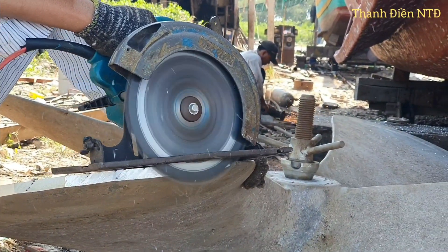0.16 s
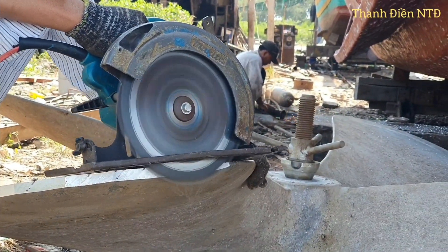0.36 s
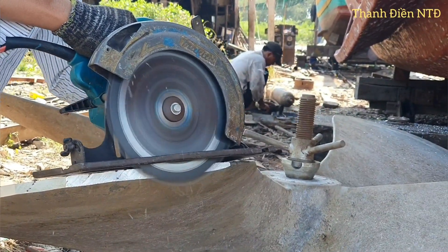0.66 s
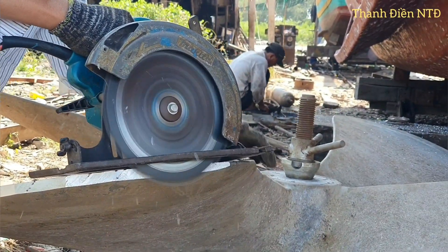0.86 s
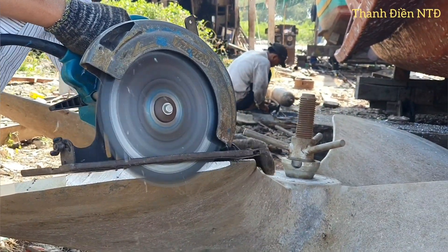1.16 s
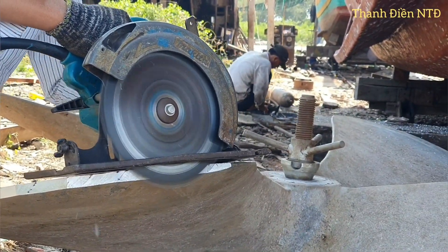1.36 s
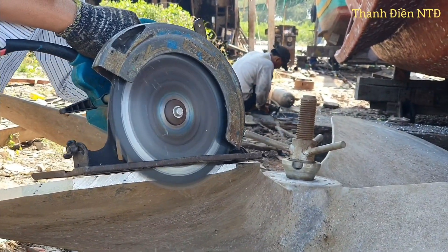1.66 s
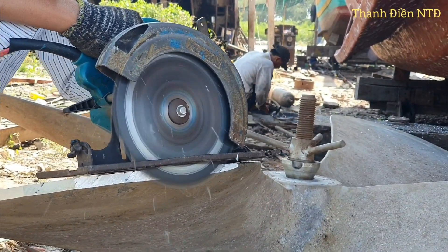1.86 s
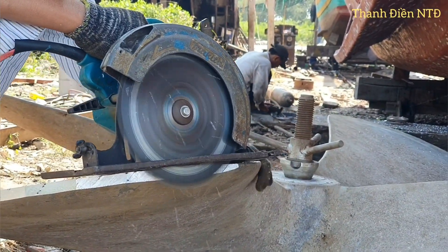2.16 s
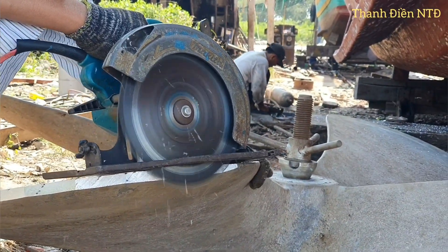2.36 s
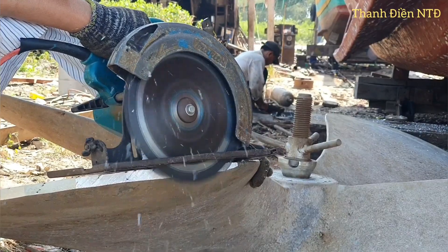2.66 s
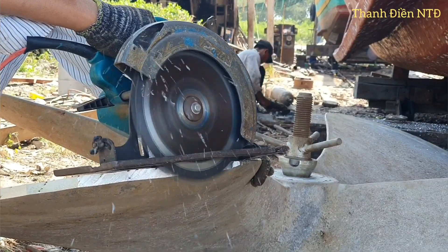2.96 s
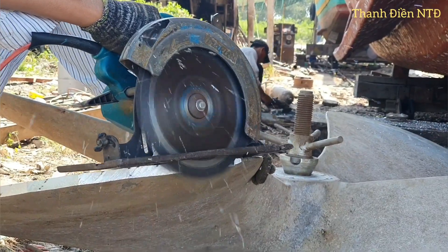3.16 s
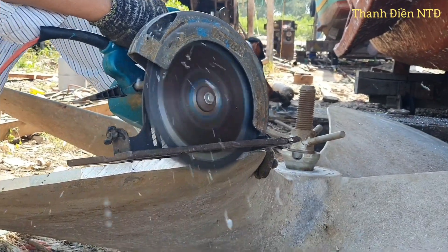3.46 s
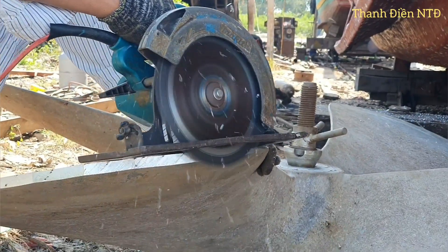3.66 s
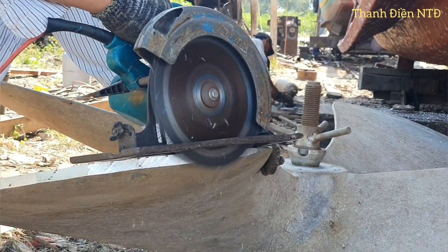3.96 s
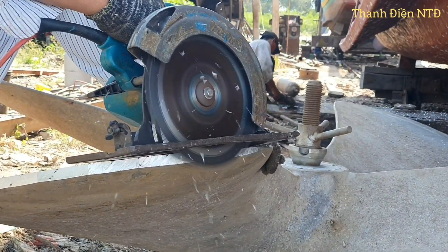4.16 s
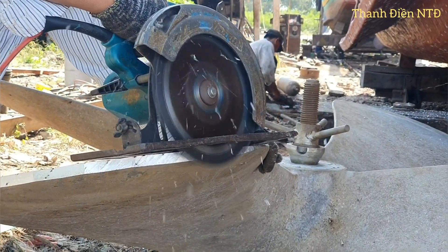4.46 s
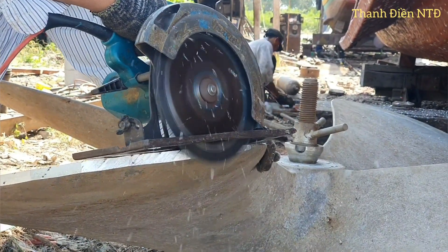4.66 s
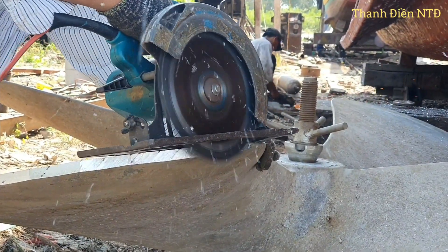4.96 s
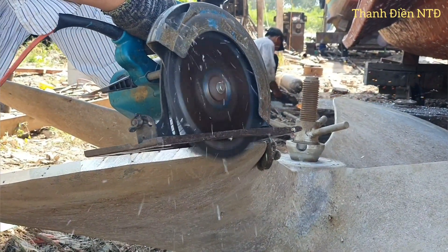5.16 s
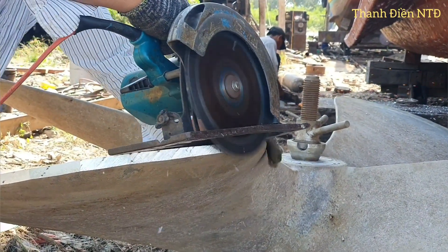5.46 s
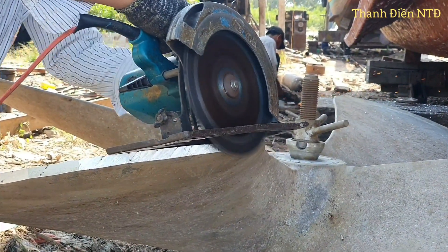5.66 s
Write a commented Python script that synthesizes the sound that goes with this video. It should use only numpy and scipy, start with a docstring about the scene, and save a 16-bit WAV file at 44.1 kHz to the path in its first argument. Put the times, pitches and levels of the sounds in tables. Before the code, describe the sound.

Very close to a stereo microphone, a handheld circular saw is already cutting thick aluminium. A dense, rough, high whine and bright hiss run throughout over rapid buzzing chatter, while the bite repeatedly slackens and digs in again. A brief rising squeal comes at about one second, and low gusts of air buffet the microphone. Near the end the chatter weakens and the sound shifts a little to the right. Dry, with no audible echo.

```python
"""Right in front of a two-port microphone, a handheld circular saw cuts a thick aluminium blade.
The teeth scrape at random and keep the steel disc and the workpiece ringing; the hand's feed swells and eases the bite.
Friction locks disc modes into held tones and, for a moment, a squeal; the workpiece chatters once a turn.
Chips hiss out of the kerf in filtered noise, and the air thrown by the disc buffets the microphone in lumps."""
import sys
import numpy as np
from scipy import signal
from scipy.fft import rfft, irfft, next_fast_len
from scipy.io import wavfile
from scipy.ndimage import uniform_filter1d, map_coordinates

SR = 44100
rng = np.random.default_rng(int(sys.argv[2]) if len(sys.argv) > 2 else 0)


def pcm_store(signal):
    """Save signal as 16-bit PCM."""
    levels = np.round(np.clip(np.atleast_2d(signal), -1, 1) * 32767)
    wavfile.write(sys.argv[1], SR, levels.astype(np.int16).T)


N = 257141  # length in samples

# how hard the hand drives the saw, heard as the strength of the draught: (time [s], relative level [dB])
FEED_CURVE = [(0, -49), (0.55, -40.3), (0.75, -34.5), (1.2, -36.9), (1.46, -30), (1.65, -35), (2.1, -46),
              (2.4, -37.5), (2.6, -32.5), (2.95, -39.5), (3.27, -33.5), (3.8, -43), (4.3, -33.5),
              (4.6, -35), (5.0, -37), (5.25, -33.5), (5.5, -38), (5.83, -43.5)]
# the disc digs in: (time [s], half length [s], extra chatter [dB], extra draught [dB])
DIG_INS = [(.01, 0.03, 6, 7), (.09, .03, 4.5, 0), (.18, .04, 3.5, 0), (.46, 0.1, 3.5, 1),
           (.72, 0.031, 1.5, 5), (.96, 0.043, 3, 4), (1.13, .06, 5, 3.5), (1.44, 0.032, 6, 3),
           (1.91, 0.063, 3.5, 1), (2.23, .06, 4.5, -6), (2.38, .05, 3, 4), (2.5, 0.03, 7, -1),
           (3.01, 0.026, 2, -2), (3.55, .05, 0, 6), (4.02, 0.13, 4.5, -2), (4.12, .04, 3.5, 6),
           (4.32, 0.045, 7, 2), (4.59, 0.061, 0, 6), (4.79, 0.036, 4.5, 6.5), (5.25, .04, 0, 4)]


def amp(db):
    """Decibels to gain."""
    return 10 ** (np.asarray(db) / 20)


def unit(x):
    """Scale to rms 1."""
    return x / np.sqrt(np.mean(x ** 2) + 1e-20)


def along(points, hz):
    """Join (frequency [Hz], value) points on a log frequency axis."""
    f, v = np.transpose(points)
    return np.interp(np.log(hz + 1), np.log(f + 1), v)


def curves(rows):
    """One value per sample for each column after the time."""
    s, *cols = np.transpose(rows)
    return [np.interp(np.arange(N) / SR, s, c) for c in cols]


def swells(rows):
    """Smooth bumps from (time [s], half length [s], height, ..) rows: one curve for each height column."""
    rows = np.array(rows, float)
    t = np.arange(N) / SR
    total = np.zeros((rows.shape[1] - 2, N))
    for s, half, *heights in rows:
        near = np.abs(t - s) < half
        bump = np.cos(np.pi / 2 * (t[near] - s) / half) ** 2
        total[:, near] += np.outer(heights, bump)
    return total


def wobble(rate):
    """A smooth random curve, rate knots a second."""
    knots = rng.standard_normal(int(N * rate / SR) + 4)
    coarse = np.arange(0, N, 16)  # spline every 16th sample, straight lines between
    return np.interp(np.arange(N), coarse, map_coordinates(knots, [coarse * rate / SR]))


def filtered(x, response):
    """Shape the spectrum of x by a response of frequency."""
    m = next_fast_len(N + 8192)
    return irfft(rfft(x, m) * response(np.fft.rfftfreq(m, 1 / SR)), m)[..., :N]


def panned(db):
    """Left and right gains of constant power for a left-minus-right level in dB."""
    ratio = amp(db)
    return np.array([ratio, np.ones_like(ratio)]) * np.sqrt(2 / (1 + ratio ** 2))


def ports(pair):
    """Each microphone port has its own colour and delay."""
    # (frequency [Hz], left minus right level [dB])
    balance = [(60, -4), (150, -2.5), (330, -7), (700, -4), (1000, -.3), (1450, -2.5), (2700, -.5),
               (4300, -9), (6400, -9), (8300, 0), (9400, 6), (11200, -3), (12100, -5), (14500, 0)]
    # (frequency [Hz], phase by which the left leads [rad])
    lead = [(3500, 0), (5000, 1.84), (6300, 3.5), (7000, 3.5), (8200, 8), (9200, 9.5), (10500, 9.5),
            (12100, 10.5), (13300, 13.5), (15000, 14.5)]

    def response(hz):
        half_leads = np.outer([0.5, -0.5], along(lead, hz))
        return panned(along(balance, hz)) * np.exp(1j * half_leads)
    return filtered(pair, response)


def scrape(patchy_db):
    """Two random forces whose strength drifts from band to band, as the contact wanders."""
    z = signal.stft(rng.standard_normal((2, N)), nperseg=1024)[2]
    field = rng.standard_normal(z.shape[1:])
    field = uniform_filter1d(field, size=5, axis=0)  # across frequency
    field = uniform_filter1d(field, size=12, axis=1)  # across time
    return signal.istft(z * amp(patchy_db * unit(field)), nperseg=1024)[1][:, :N]


def ring(force, modes, bed):
    """A force through resonances and a broad noise bed, as both ports hear it; the middle has rms 1."""
    # how alike the ports sound: (frequency [Hz], likeness [0-1])
    likeness = [(100, .05), (300, 0.074), (700, 0.3), (1000, 1), (1280, 0.49), (2000, 0.31), (2700, 0.82),
                (3400, .35), (4500, 0.27), (6500, 0.29), (10000, 0.17), (15000, 0.18)]

    def response(hz):
        power = amp(along(bed, hz)) ** 2 if bed else 0
        for centre, width, db in modes:
            detuning = 2 * (hz - centre) / width
            power = power + (amp(db) / (1 + (np.sqrt(2) - 1) * detuning ** 2)) ** 2  # -3 dB at the width
        turn = np.arccos(np.clip(along(likeness, hz), -1, 1)) / 2
        return np.sqrt(power) * np.array([np.cos(turn), np.sin(turn)])
    mid, side = filtered(force, response)
    pair = ports(np.array([mid + side, mid - side]))
    return pair / np.std(pair.mean(axis=0))


def bent(pair, shift):
    """Glide every resonance by a shift in per cent, by reading the sound faster or slower."""
    place = np.cumsum(1 + shift / 100)
    fine = signal.resample_poly(pair, 2, 1, axis=1)  # doubled rate keeps the treble clean
    return np.array([map_coordinates(side, [2 * place], mode="mirror") for side in fine])


def tone(hz, shift, jitter_hz, flutter_db):
    """A self-excited vibration of rms 1, unsteady in pitch and strength; shift in per cent."""
    pitch = hz * (1 + shift / 100) + jitter_hz * wobble(70)
    wave = np.sin(2 * np.pi * np.cumsum(pitch) / SR)
    return unit(amp(flutter_db * wobble(16)) * wave)


def hand():
    """What the hand does: feed in dB about its mean, easing off 0-1, withdrawal 0-1."""
    # the whole cut slackens: (time [s], half length [s], depth [0-1])
    eases = [(.09, 0.068, 0.3), (.33, 0.15, 1), (.57, .05, 0.54), (1.56, 0.1, 0.73), (1.69, 0.061, 0.4),
             (2.02, 0.25, 0.58), (2.68, 0.14, 0.97), (2.93, 0.09, 0.26), (3.44, 0.14, 0.9),
             (3.64, 0.034, 0.3), (4.21, 0.067, 0.4), (4.41, .07, 0.9), (4.69, 0.054, 0.52),
             (4.85, .03, 0.25), (4.99, .08, 0.8)]
    withdraw_s, withdraw_length_s = 5.23, 0.25  # the saw swings back out of the cut
    feed_db, = curves(FEED_CURVE)
    withdrawn = np.clip((np.arange(N) / SR - withdraw_s) / withdraw_length_s, 0, 1)
    return feed_db - feed_db.mean(), swells(eases)[0], withdrawn


def draught(feed_db, ease):
    """Air flung off the disc rushes through the guard and reaches the ports in lumps."""
    # hollows of the disc guard, blown by the draught: (frequency [Hz], width [Hz], relative level [dB per Hz])
    guard_modes = [(335, 57, -0.5), (460, 59, 0), (587, 46, -1), (770, 92, 0)]
    # broad rush and low buffeting: (frequency [Hz], relative level [dB per Hz])
    gust_bed = [(40, -6), (160, -8), (240, -1), (550, -7.5), (800, -0.5), (1300, -12), (3000, -58)]
    thump_bed = [(15, -22), (35, -1.5), (60, 3.5), (100, -3.5), (180, -33), (500, -60)]
    dig_db = swells(DIG_INS)[1]
    lumps = wobble(20)
    gust_db = curves(FEED_CURVE)[0] - 1.3 + dig_db - 4.3 * ease + 1.1 * lumps
    thump_db = -49.6 + 0.75 * feed_db + dig_db - 9 * ease + 2.6 * lumps
    gust = ring(amp(1.3 * wobble(35)) * scrape(patchy_db=2), guard_modes, gust_bed)
    thump = ring(amp(2.0 * wobble(18)) * scrape(patchy_db=2.2), [], thump_bed)
    return amp(gust_db) * gust + amp(thump_db) * thump


def chips(turns, feed_db, ease, withdrawn):
    """Tiny chips tear off in uneven spurts and hiss out of the kerf, the more the harder the feed."""
    # resonances of the kerf: (frequency [Hz], width [Hz], relative level [dB per Hz])
    kerf_modes = [(8330, 180, -12.5), (8985, 53, -3), (9420, 210, -11), (9675, 144, -12), (10100, 210, -9),
                  (10840, 77, -8), (11300, 70, -20), (14790, 90, -15)]
    # broad hiss: (frequency [Hz], relative level [dB per Hz])
    chip_bed = [(6000, -40.5), (8500, -12), (10500, -13.5), (11600, -9), (13000, -11), (14200, -13.5),
                (15600, -15.5)]
    hiss_db = -20.0 + 0.13 * feed_db - 4.3 * ease - 1.1 * withdrawn + 0.66 * wobble(14)
    pan_db = 1.1 - 3.7 * ease - 4.8 * withdrawn + 0.52 * wobble(14)
    once_a_turn = 0.5 * np.cos(2 * np.pi * turns)
    spurts = amp(once_a_turn + 0.34 * wobble(600) + 0.95 * wobble(30))
    hiss = ring(spurts * scrape(patchy_db=1.55), kerf_modes, chip_bed)
    return amp(hiss_db) * panned(pan_db) * hiss


def knocks(turns, scatter_db, t60):
    """The high side of the disc strikes once a turn, each time with another strength."""
    chatter_hz = 1004
    at = np.flatnonzero(np.diff(np.floor(turns)))
    blows = np.zeros(N)
    blows[at] = amp(scatter_db * np.clip(rng.standard_normal(len(at)), -2, 1.5))
    t = np.arange(SR // 10) / SR
    struck = amp(-60 * t / t60) * np.sin(2 * np.pi * chatter_hz * t)
    knock = unit(signal.fftconvolve(blows, struck)[:N])
    return ports(np.array([knock, knock]))


def workpiece(turns, ease):
    """The aluminium rings under the teeth; the disc's run-out makes it chatter once a turn."""
    # depth of the bite, heard as the level of the chatter: (time [s], relative level [dB])
    bite_curve = [(0, -23.5), (0.6, -26.5), (1.1, -25.5), (1.7, -27), (2.4, -25), (3.5, -27.5),
                  (4.05, -29.5), (4.9, -31), (5.35, -27), (5.55, -39), (5.83, -36)]
    # strength of the ringing workpiece: (time [s], relative level [dB])
    ring_curve = [(0, -27), (0.65, -24.5), (1.1, -25.8), (1.65, -26), (2.25, -28.5), (2.55, -26),
                  (2.95, -27.5), (3.7, -26), (4.45, -26.5), (4.9, -27.3), (5.3, -26.5), (5.83, -33)]
    # resonances: (frequency [Hz], width [Hz], relative level [dB per Hz])
    chatter_modes = [(954, 50, -7), (1006, 21, -4.5), (1086, 40, -9)]
    plate_modes = [(1293, 36, -21), (1397, 16, -7.5), (1430, 101, -12.5), (1530, 37, -14), (1660, 80, -19),
                   (1807, 130, -16), (2190, 35, -16.5), (3023, 35, -12), (3325, 23, -11.5),
                   (3380, 18, -5.5), (3670, 54, -10), (3953, 19, -3.5), (4184, 83, -7.5), (4370, 13.4, -4)]
    # broad scraping between the resonances: (frequency [Hz], relative level [dB per Hz])
    chatter_bed = [(300, -58), (600, -22), (800, -23.5), (1100, -25), (1300, -26), (2000, -70)]
    plate_bed = [(700, -33.5), (1200, -19), (1600, -22), (2400, -21.5), (3200, -16.5), (4200, -17.5),
                 (5200, -35), (7000, -80)]
    chatter_db = curves(bite_curve)[0] + swells(DIG_INS)[0] - 4.5 * ease + 0.94 * wobble(45)
    ring_db = curves(ring_curve)[0] - 1.9 * ease + 0.65 * wobble(16)
    bite = amp(-2.5 * (turns % 1) + 1.7 * wobble(110))  # sets in sharply, eases through the turn
    chatter = ring(bite * scrape(patchy_db=2), chatter_modes, chatter_bed)
    plate = ring(amp(0.79 * wobble(250)) * scrape(patchy_db=2.5), plate_modes, plate_bed)
    pounding = knocks(turns, scatter_db=4.0, t60=0.1)
    return amp(chatter_db - 5.0) * chatter + amp(chatter_db - 11.0) * pounding + amp(ring_db - 1.0) * plate


def squeal():
    """The disc rubs the side of the kerf, binds and squeals in a few close, unsteady, rising partials."""
    # partials: (frequency at the middle of the squeal [Hz], relative level [dB])
    lines = [(1550, -28), (1669, -31), (1787, -32)]
    middle_s, half_s, boost_db, rise_percent_per_s = 1.095, 0.085, 3.5, 30
    since = np.clip(np.arange(N) / SR - middle_s, -half_s, half_s)
    rise = rise_percent_per_s * since
    partials = sum(amp(db) * tone(hz, rise, jitter_hz=16.3, flutter_db=3.0) for hz, db in lines)
    return swells([(middle_s, half_s, amp(boost_db))])[0] * partials


def locked_modes(tremble):
    """Friction locks modes into held tones that swell and fade; the teeth shake the higher ones more."""
    # held tones, half swelled at start and end: (start [s], end [s], frequency [Hz], relative level [dB])
    locked = [(0.0, 0.79, 3938, -34), (0.4, 2.6, 5200, -27.5), (0.4, 2.9, 4891, -29.5),
              (0.45, 3, 6272, -28.5), (0.55, 2.9, 13500, -28.5), (1.019, 1.09, 2982, -30),
              (1.421, 1.65, 2170, -36.5), (2.0, 2.6, 12400, -30), (2.35, 2.79, 1445, -33),
              (2.3, 5.2, 6950, -31), (2.8, 6.3, 12091, -28), (3.0, 5, 3935, -38), (3.2, 4.7, 4861, -26),
              (3.25, 6, 4300, -34.5), (3.3, 4.1, 5865, -39), (3.3, 4.9, 12150, -24.5),
              (3.45, 3.95, 3370, -35), (3.6, 4.35, 3704, -36.5), (3.9, 4.8, 1420, -35),
              (3.9, 4.2, 12487, -38), (4.1, 6.3, 5270, -35), (4.249, 4.55, 3365, -30.5),
              (5.1, 6.4, 3360, -40)]
    t = np.arange(N) / SR
    total = np.zeros(N)
    for start, end, hz, db in locked:
        swell = np.clip(np.minimum(t - start, end - t) / 0.13 + 0.5, 0, 1)
        held = tone(hz, tremble, jitter_hz=6 + 0.00141 * hz, flutter_db=4.5)
        total += amp(db - 1.0) * swell * held
    return ports(np.array([total, total]))


def singing(shift, withdrawn):
    """Friction feeds the low disc modes, whose rough ringing and held tones swell and fade together."""
    # the lower mode, then the upper pair: (frequency [Hz], width [Hz], relative level [dB per Hz])
    low_modes = [(1953, 59, -8), (2680, 45, 1), (2741, 14.4, 4)]
    # friction catches and lets go: (time [s], half length [s], lower mode's rise [dB], upper pair's rise [dB])
    catches = [(.09, 0.11, 13, 3), (.21, .04, -6, 7), (.29, .04, 9, -3), (.555, 0.06, 18, 0),
               (.645, 0.056, 15.5, 6), (.73, .04, 9, 4), (.99, 0.071, 11, 5), (1.13, 0.067, 13, 6),
               (1.38, .05, 13.5, 4), (1.49, .07, 3, 11), (1.58, 0.1, 1, 10), (2.2, .04, 6, 4),
               (2.87, 0.042, -1, 8), (3.275, .07, 5, 10.5), (3.36, 0.065, 11.5, -5), (3.46, .04, 6, 8),
               (3.55, 0.085, 13, 2), (3.72, 0.076, 6, 5.5), (4.03, 0.093, 7, 5), (4.22, 0.037, 9, 0),
               (4.3, .05, 2, 8), (4.41, 0.14, 11.5, -5), (4.77, 0.054, 4, 1)]
    lower_rise_db, upper_rise_db = swells(catches)
    lower_db = -42.0 + lower_rise_db - 8 * withdrawn + 0.95 * wobble(25.04)
    upper_db = -36.5 + upper_rise_db - 4 * withdrawn + 1.0 * wobble(18)
    lower = amp(lower_db - 4.0) * ring(scrape(patchy_db=2.5), low_modes[:1], None)
    upper = amp(upper_db - 1.0) * ring(scrape(patchy_db=0.5), low_modes[1:], None)
    lower_held = amp(lower_db) * tone(low_modes[0][0], shift, jitter_hz=12.8, flutter_db=-2)
    upper_held = amp(upper_db - 7.0) * tone(low_modes[1][0], shift, jitter_hz=13.7, flutter_db=0.5)
    held = lower_held + upper_held
    return lower + upper + ports(np.array([held, held]))


def disc(shift, ease, withdrawn):
    """The steel disc whines in many modes, less to the left as the cut slackens; the top ones shrill under load."""
    # strength of the whine and of the shrill top modes: (time [s], relative level [dB])
    whine_curve = [(0, -15.5), (1.3, -16.0), (2.05, -17.5), (2.45, -16), (2.95, -18), (4.0, -17),
                   (4.95, -18), (5.5, -17), (5.83, -17)]
    shrill_curve = [(0, -19.5), (1, -20), (1.45, -17.5), (2.4, -19.5), (2.95, -14.5), (3.6, -20),
                    (5.3, -18.5), (5.5, -28), (5.83, -27)]
    # resonances before the pitch shift: (frequency [Hz], width [Hz], relative level [dB per Hz])
    whine_modes = [(4515, 59, -12.5), (4676, 63, -11), (4863, 76, -5.5), (5214, 95, -6), (5420, 40, -6),
                   (5830, 13, 1), (5877, 62, -6), (6090, 160, -9), (6230, 40, -1), (6400, 73, -10),
                   (6640, 17, -1.5), (6830, 160, -14), (7000, 63, -4), (7280, 150, -6.5), (7600, 65, -11.5),
                   (8200, 164, -10)]
    shrill_modes = [(11930, 59, -4.5), (12090, 165, -11), (12280, 34, -2.5), (12950, 55, -7),
                    (13000, 81, -9), (13390, 130, -5)]
    # broad scraping between the whine's modes: (frequency [Hz], relative level [dB per Hz])
    whine_bed = [(3000, -44), (4300, -17.5), (5500, -11.5), (7200, -15.5), (8200, -16.5), (9500, -50),
                 (12000, -80)]
    whine_db = curves(whine_curve)[0] - 3.0 - 2.4 * ease + 0.51 * wobble(18)
    shrill_db = curves(shrill_curve)[0] - 4.3 - 1.6 * ease + 1.0 * wobble(22)
    pan_db = 1.4 - 6.3 * ease - 4.9 * withdrawn + 1.3 * wobble(12)
    whine = bent(ring(scrape(patchy_db=1.0), whine_modes, whine_bed), shift)
    shrill = bent(ring(scrape(patchy_db=3.0), shrill_modes, None), 0.6 * shift)
    return amp(whine_db) * panned(pan_db) * whine + amp(shrill_db) * shrill


def scene():
    """One hand and one spindle, with a shared random tremble of the disc's pitch, drive the parts."""
    # slow drift of the disc modes' pitch: (time [s], pitch shift [%])
    pitch_drift = [(0, -0.58), (.6, 0.22), (1.6, 0.34), (2.5, 0.23), (3.3, -0.24), (4.2, .1), (5, -0.26),
                   (5.83, -0.71)]
    spindle_hz = 58.57  # mean turns a second
    feed_db, ease, withdrawn = hand()
    tremble = 0.1514 * wobble(7)
    shift = curves(pitch_drift)[0] + tremble
    speed_hz = spindle_hz * (1 + 0.02 * wobble(4) + 0.0121 * wobble(60))
    turns = np.cumsum(speed_hz) / SR
    air = draught(feed_db, ease) + chips(turns, feed_db, ease, withdrawn)
    steel = squeal() + locked_modes(tremble) + singing(shift, withdrawn) + disc(shift, ease, withdrawn)
    return air + workpiece(turns, ease) + steel


def record(dry):
    """Round off the highest peaks smoothly, then keep nothing above the band limit."""
    ceiling, top_hz = 0.95, 15750
    rounded = dry / (1 + np.abs(dry / ceiling) ** 8) ** (1 / 8)
    return filtered(rounded, lambda hz: hz < top_hz)


dry = scene()
out = record(dry)
pcm_store(out)
```